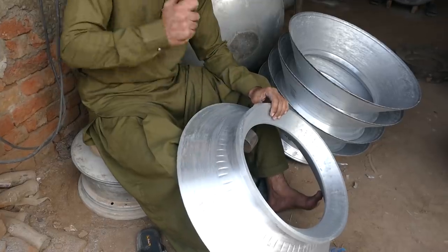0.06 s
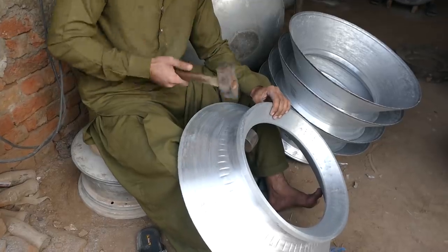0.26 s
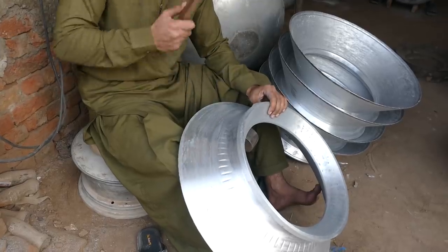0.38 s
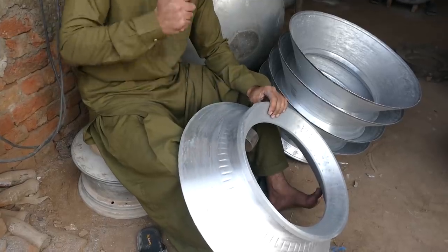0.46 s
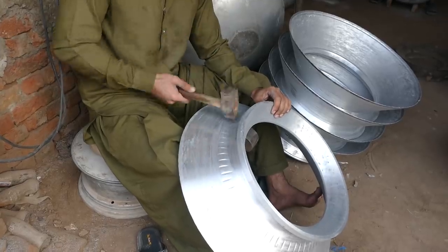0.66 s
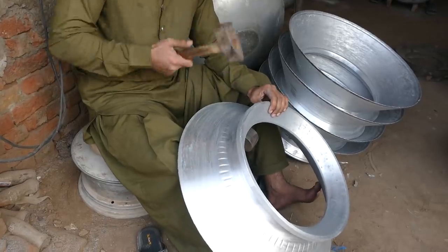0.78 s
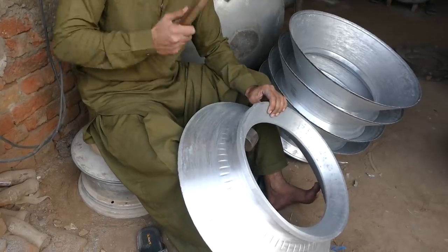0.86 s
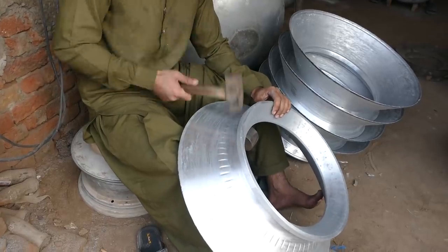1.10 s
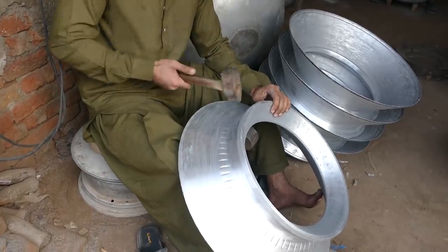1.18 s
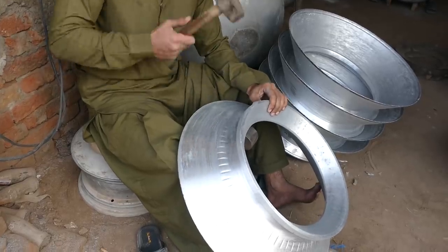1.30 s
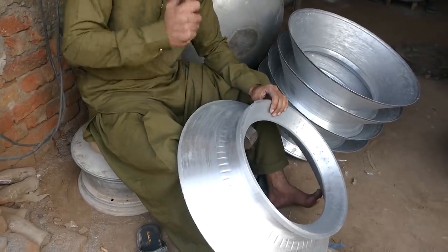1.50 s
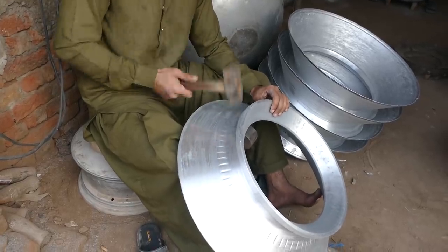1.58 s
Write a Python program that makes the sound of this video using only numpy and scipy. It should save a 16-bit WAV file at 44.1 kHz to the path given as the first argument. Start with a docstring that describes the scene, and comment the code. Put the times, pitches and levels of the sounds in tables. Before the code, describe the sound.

A hammer strikes a large aluminium vessel close by at about 0.2, 0.7 and 1.2 seconds, each blow a sharp crack and ping with a short metallic ring. Ringing from an earlier blow is fading at the start. Farther off in the workshop, a second hammer hits sheet metal at about 0.5 and 1.3 seconds. Underneath, a faint distant engine throbs, growing slightly louder.

```python
"""A hammer planishes a large aluminium vessel with even blows, close by in a brick workshop.
Each blow cracks, pings, thuds and rings the shell's modes until a hand damps them. Farther off a second
hammer beats sheet metal at a slower pace, heard mostly through the room. A distant engine throbs,
each firing sounding its exhaust pipe, over quiet shop air with a brief faint tone."""
import sys
import numpy as np
from scipy import signal
from scipy.fft import rfft, irfft
from scipy.io import wavfile

SR = 44100
rng = np.random.default_rng(int(sys.argv[2]) if len(sys.argv) > 2 else 0)


def generate_wav(sig):
    """Save sig (samples, or channels by samples) to the path in sys.argv[1] as 16-bit PCM at SR."""
    pcm = np.round(np.clip(np.atleast_2d(sig).T, -1, 1) * 32767).astype(np.int16)
    wavfile.write(sys.argv[1], SR, pcm)


N = 72765
TIME_S, BINS_HZ = np.arange(N) / SR, np.fft.rfftfreq(N, 1 / SR)


def undb(db):
    """Decibels to gain."""
    return 10 ** (np.asarray(db) / 20)


def at(points, hz):
    """Read (f/Hz, value) points on a log-frequency axis."""
    f, v = np.array(points, float).T
    return np.interp(np.log(np.maximum(hz, 1)), np.log(f), v)


def fade(t60_s, hold_s=0):
    """Full level for hold_s, then exponential decay."""
    return np.exp(-np.log(1000) * np.maximum(TIME_S - hold_s, 0) / t60_s)


def rise(tau_s):
    """Exponential approach to full level."""
    return 1 - np.exp(-TIME_S / tau_s)


def add(out, x, start_s):
    """Mix x into out from start_s."""
    i = int(round(start_s * SR))
    a, b = max(i, 0), min(N, N + i)
    out[:, a:b] += x[:, a - i:b - i]


def die_away(x, t60s):
    """Each band of x decays at its own rate."""
    spectrum, centres_hz = rfft(x), [hz for hz, _ in t60s]
    return sum(irfft(spectrum * at(list(zip(centres_hz, share)), BINS_HZ), N) * fade(t60_s)
               for share, (_, t60_s) in zip(np.eye(len(t60s)), t60s))


# Stereo width of the shop: f/Hz, side over mid/dB
WIDTH = [(100, -17.5), (250, -23.5), (550, -16.5), (1100, -5), (2400, -8.5), (8000, -15), (13000, -14.5)]


def noise(colour, width_db=0):
    """Coloured stereo noise, rms 1."""
    mid, side = rfft(rng.standard_normal((2, N))) * undb(at(colour, BINS_HZ))
    side *= undb(at(WIDTH, BINS_HZ) + width_db)
    x = irfft(np.array([mid + side, mid - side]), N)
    return x / x.std()


def ring(modes, t60_scale=1, width_db=-0.5):
    """Struck modes: decaying stereo sines, t60 limited to 0.03-1.2 s."""
    out = np.zeros((2, N))
    for (hz, db, t60_s), side_phase in zip(modes, rng.uniform(0, 2 * np.pi, len(modes))):
        t60_s = np.clip(t60_s * t60_scale, .03, 1.2)
        t = TIME_S[:int(1.2 * t60_s * SR)]
        phase = np.sqrt(hz)  # bending waves disperse
        mode = undb(db) * np.exp((2j * np.pi * hz - np.log(1000) / t60_s) * t + 1j * phase)
        side = undb(at(WIDTH, hz) + width_db) * np.exp(1j * side_phase)
        out[:, :len(t)] += np.imag([mode * (1 + side), mode * (1 - side)])
    return out * rise(tau_s=0.00021)


def clustered(colour, spread_db, spacing_hz=141.4):
    """A colour with the random peaks and valleys of a plate's clustered modes."""
    hz = np.concatenate([np.geomspace(30, 900, num=16), 1000 + spacing_hz * np.arange(140)])
    ripple_db = spread_db * np.sqrt(3) * rng.uniform(-1, 1, len(hz)) * (hz > 950)
    return np.column_stack([hz, at(colour, hz) + ripple_db])


def weak_modes(colour, t60s, count):
    """Thin metal's many weak modes, unit total power: f/Hz, level/dB, t60/s."""
    place, size = rng.random((count, 2)).T
    hz = 1100 + 12900 * (np.arange(count) + place) / count
    db = at(colour, hz) + 12 * size
    db -= 10 * np.log10(np.sum(undb(db) ** 2) / 2)
    return np.column_stack([hz, db, at(t60s, hz)])


# Air spectrum: f/Hz, level/dB
AIR_COLOUR = [(18, -63.5), (30, -47), (127, -13.5), (204, -6), (666, -13.5), (937, -25), (1500, -20.5),
              (2680, -26), (11400, -46.5), (16000, -55)]


def air(tone_hz=1520):
    """Quiet shop air; a faint thin tone hangs in it at first."""
    tone = undb(-67.5) * np.sin(2 * np.pi * tone_hz * TIME_S) * fade(t60_s=.5, hold_s=0.23)
    return undb(-63) * noise(AIR_COLOUR) + tone


# Puff spectrum: f/Hz, level/dB
PUFF_COLOUR = [(29, -89), (50, -75), (156, -6), (217, 2), (349, 0), (386, -7), (437, -16), (1000, -41),
               (1300, -77.5), (2200, -120)]
# Exhaust pipe resonances: f/Hz, level/dB
PIPE_MODES = [(215, 3.5), (335, -3.5)]
# Engine swell: t/s, level/dB
ENGINE_LEVEL = [(0, -64.5), (.9, -60), (1.1, -58.5), (1.6, -54.5)]


def engine(firing_hz=23.1, sync_s=1.066, puff_peak_s=.009, lowpass_hz=1000):
    """Distant engine, growing louder: each firing is a dull puff that briefly sounds the pipe."""
    cycles = (TIME_S - sync_s) * firing_hz
    firing = (cycles - np.floor(cycles[0])).astype(int)
    age_s = cycles % 1 / firing_hz
    phases = rng.uniform(0, 2 * np.pi, (firing[-1] + 1, len(PIPE_MODES)))[firing].T
    pipe = sum(undb(db) * np.sin(2 * np.pi * hz * age_s + phase)
               for (hz, db), phase in zip(PIPE_MODES, phases))
    gas = undb(-1) * noise(PUFF_COLOUR, width_db=-5)
    puffs = (pipe + gas) * (age_s * np.exp(-age_s / puff_peak_s)) ** 2
    throb = irfft(rfft(puffs) / (1 + (BINS_HZ / lowpass_hz) ** 4), N)
    return throb / throb.std() * undb(np.interp(TIME_S, *np.array(ENGINE_LEVEL).T))


# Blows on the sheet: t/s, level/dB, slap/dB, swell/s, treble/dB
SHEET_BLOWS = [(-0.27, 1.5, 0, .004, 11.5), (0.4995, 0.5, -1, 0.00081, 1.5), (1.269, -1, -5, 0.0074, 7)]
# Sheet modes: f/Hz, level/dB, t60/s
SHEET_MODES = [(1184, -43, 0.8), (1653, -43.9, 0.79), (1781, -38.1, 0.76), (1945, -36.7, 0.51),
               (2110, -33.3, 0.37), (2314, -31.7, 0.41), (2356, -34.0, 0.37), (2428, -34.8, 0.55),
               (2698, -39.9, 0.68), (2773, -39.6, 0.66), (4304, -33.7, 0.3), (4852, -39.6, 0.35),
               (5751, -37.6, 0.3), (6358, -37.7, 0.31), (6903, -41.5, 0.34), (12478, -41, 0.22)]
# Sheet spectrum: f/Hz, level/dB
SHEET_COLOUR = [(35, -64), (60, -23.5), (238, -4.5), (437, -13), (621, -5.5), (698, -10.5), (1170, -12.5),
                (1280, -18.5), (1740, -12), (2350, -9), (3190, -9), (4320, -12), (4640, -14),
                (12700, -25.5), (16000, -32.5)]
# Sheet decay: f/Hz, t60/s
SHEET_T60 = [(100, 0.1), (400, 0.52), (2000, 0.52), (6000, .36), (12000, 0.31)]


def far_hammer():
    """Blows on sheet metal across the shop: a slap, then dense modes that swell in the room."""
    sheet = clustered(SHEET_COLOUR, spread_db=3)
    weak = weak_modes(sheet, SHEET_T60, count=150)
    out = np.zeros((2, N))
    for start_s, db, slap_db, swell_s, treble_db in SHEET_BLOWS:
        tilt = [(4000, 0.014), (11000, treble_db)]
        colour = [(hz, level_db + at(tilt, hz)) for hz, level_db in sheet]
        slap = undb(slap_db - 20.5) * noise(colour) * fade(t60_s=0.042)
        tone = undb(-2.5) * ring(SHEET_MODES) + undb(-27.5) * ring(weak)
        room = undb(-23) * die_away(noise(colour, width_db=1), SHEET_T60)
        add(out, undb(db) * (slap + (tone + room) * rise(swell_s)), start_s)
    return out


# Blows on the vessel: t/s, level/dB, crack/dB, thud/dB, ring/dB
VESSEL_BLOWS = [(-0.237, -2, 13.5, 11, 3), (0.238, -0.5, 2, -3.5, 0), (0.7132, -1.5, 0, -1, 1.5),
                (1.1874, -0.5, 2, 1.5, 0)]
# Contact crack, body thud and shell spectra: f/Hz, level/dB
CRACK_COLOUR = [(120, -54.5), (200, -6), (763, -10.5), (1840, -11), (2210, -8), (2860, -1), (4350, -12),
                (4950, -8), (5420, -15), (7270, -9.5), (7970, -36.5), (12200, -14), (16000, -36.5)]
THUD_COLOUR = [(40, -20), (130, -6), (350, 0.5), (700, -7), (1500, -7), (4000, -47)]
SHELL_COLOUR = [(240, -56.5), (400, -24.5), (588, -18.5), (708, -1.5), (1140, -20), (1380, -4), (1680, -14),
                (1840, -7), (2090, -14), (2930, -0.5), (3160, -6.5), (8240, -13), (16000, -21.5)]
# Modes of the struck spot and of the shell: f/Hz, level/dB, nominal t60/s
PING_MODES = [(641, -24, 0.024), (791, -22.5, 0.038), (932, -21, 0.034), (1397, -24, 0.045),
              (1804, -28, 0.09), (2668, -20, 0.046), (2965, -25.5, 0.15), (3240, -21.5, 0.056),
              (7260, -26, .025)]
SHELL_LOW_MODES = [(695, -47.3, 1.2), (735, -43.8, 0.56), (1337, -45.7, 0.47), (1804, -35.7, 0.57),
                   (1924, -49.2, 0.67), (2258, -44.1, 0.92), (2600, -31.4, 0.43), (2684, -37.0, 0.46),
                   (2750, -42.2, 0.54), (2963, -26.0, 0.38), (3381, -35.8, 0.37), (3421, -45.1, 0.62),
                   (4162, -43.8, 1.02)]
SHELL_HIGH_MODES = [(4740, -42.5, 0.37), (5289, -47.8, 0.55), (5668, -43.7, 0.41), (5818, -45.8, 0.45),
                    (6414, -45.0, 0.34), (6636, -51.4, 0.5), (7073, -46.0, 0.38), (7729, -46.2, 0.33),
                    (8456, -39.3, 0.3), (11899, -50.5, 0.33), (12223, -51.8, 0.4)]
# Shell decay: f/Hz, t60/s
SHELL_T60 = [(300, 0.33), (800, 0.76), (2500, 0.6), (6000, 0.43), (12000, .28)]


def vessel():
    """Near blows: contact cracks and pings, the body thuds, the shell rings until gripped."""
    shell = clustered(SHELL_COLOUR, spread_db=6.5)
    weak = weak_modes(shell, SHELL_T60, count=130)
    grip = fade(t60_s=.45, hold_s=.22)  # the hand tightens on the rim to turn the vessel
    out = np.zeros((2, N))
    for start_s, db, crack_db, thud_db, ring_db in VESSEL_BLOWS:
        crack = undb(crack_db - 22.5) * noise(CRACK_COLOUR, width_db=-2.5)
        crack *= fade(t60_s=0.017, hold_s=0.0047)
        thud = undb(thud_db - 25.5) * noise(THUD_COLOUR, width_db=11.5)
        thud *= rise(tau_s=0.011) * fade(t60_s=0.15)
        tone = ring(SHELL_LOW_MODES, t60_scale=0.99) + undb(0.5) * ring(SHELL_HIGH_MODES)
        shimmer = undb(-36) * ring(weak)
        room = undb(-30.5) * die_away(noise(shell), SHELL_T60)
        ringing = undb(ring_db) * ((tone + shimmer) * grip + room)
        add(out, undb(db) * (crack + ring(PING_MODES) + thud + ringing), start_s)
    return out


def scene(pan_db=0.9):
    """Both hammers, slightly right, over the engine and the shop air."""
    pan = undb([[-pan_db / 2], [pan_db / 2]])
    return pan * (vessel() + far_hammer()) + engine() + air()


def record(dry, band_hz=(45, 15700), top_hz=15800):
    """Gentle band-pass, then a steep cut of the top treble."""
    x = signal.sosfilt(signal.butter(2, band_hz, "band", fs=SR, output="sos"), dry)
    return signal.sosfilt(signal.ellip(8, .2, 70, top_hz, fs=SR, output="sos"), x)


dry = scene()
out = record(dry)
generate_wav(out)
```